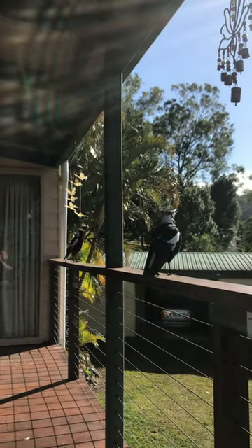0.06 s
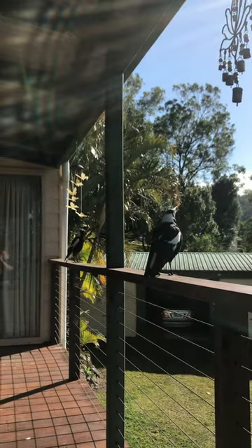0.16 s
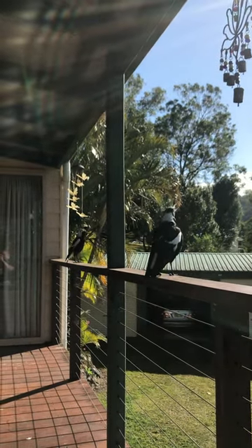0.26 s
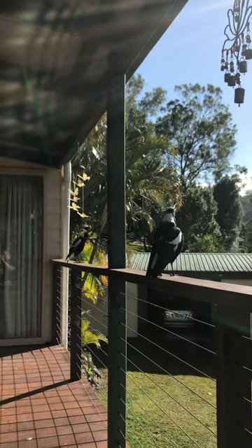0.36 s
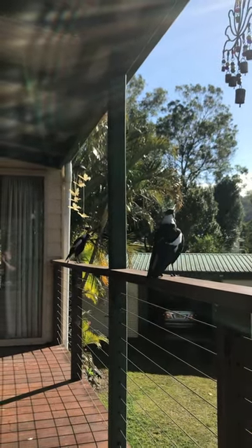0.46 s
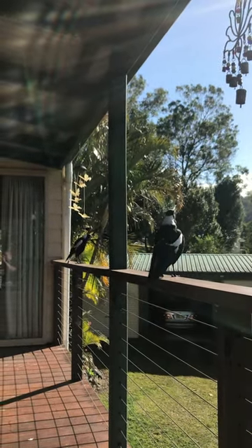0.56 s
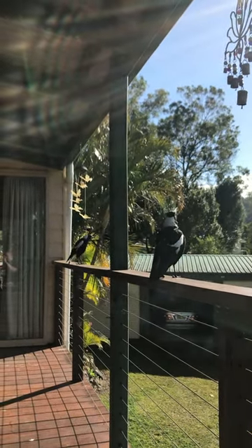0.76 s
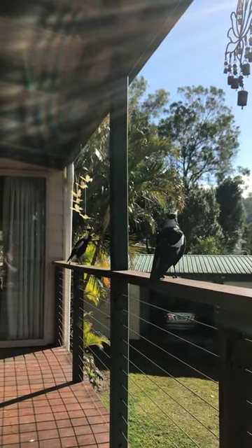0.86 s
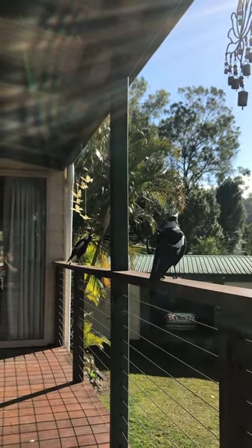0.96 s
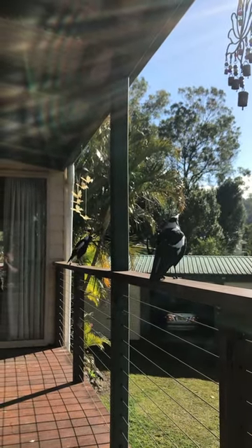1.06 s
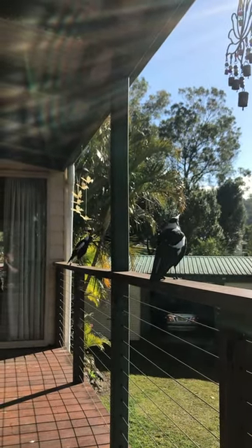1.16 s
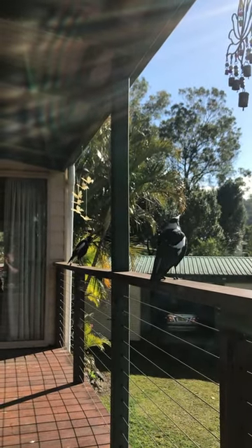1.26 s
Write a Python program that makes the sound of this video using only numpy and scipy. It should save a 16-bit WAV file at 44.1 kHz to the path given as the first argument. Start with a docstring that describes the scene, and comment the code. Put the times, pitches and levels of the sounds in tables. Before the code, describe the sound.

A magpie calls once, loudly, from a veranda rail. Soft outdoor air and faint far bird whistles open the scene; at 0.2 s a fluttering, buzzy whistle starts, drops at about 0.35 s to a longer, strong lower whistle, then weakens and turns to a growling rasp from 0.5 to 0.7 s. Roof and garden echoes fade, leaving distant hum and faint birds until about 1.3 s. Mono.

```python
"""Quiet outdoor air comes first: soft noise, a low distant hum and far birds whistling in the trees.
Then a magpie on a veranda rail gives one loud, falling two-part call.
One side of its syrinx whistles; the other pulses, fluttering the whistle and adding a buzz that ends in a rasp.
The roof and the garden answer with echoes, and one microphone channel holds it all."""
import sys
import numpy as np
from scipy import signal
from scipy.fft import rfft, irfft
from scipy.io import wavfile
from scipy.ndimage import map_coordinates

SR = 44100
rng = np.random.default_rng(int(sys.argv[2]) if len(sys.argv) > 2 else 0)


def generate_wav(sig):
    """Save sig (samples, or channels by samples) to the path in sys.argv[1] as 16-bit PCM at SR."""
    pcm = np.round(np.clip(np.atleast_2d(sig).T, -1, 1) * 32767).astype(np.int16)
    wavfile.write(sys.argv[1], SR, pcm)


N = 57330
T = np.arange(N) / SR  # seconds

# Two resonances of the opening beak. Each row: time in seconds, centre of the first in Hz,
# its level in dB, level of the second in dB (both before the beat).
BEAK_RESONANCES = [(.2, 4500, -70.5, -83.5), (.222, 4384, -39, -69.5), (.25, 4181, -39.5, -50.5),
                   (.29, 3981, -39.5, -41), (.33, 3888, -50.5, -38), (.36, 3830, -56, -58)]


def from_db(db):
    """Gain of a level in dB."""
    return 10 ** (np.asarray(db) / 20)


def rms_one(x):
    """Scale to an rms of 1."""
    return x / np.sqrt(np.mean(x ** 2) + 1e-20)


def in_time(rows):
    """Each column of a curve, at every sample."""
    seconds, *columns = np.transpose(rows)
    return [np.interp(T, seconds, column) for column in columns]


def gate(rows):
    """Open for as long as a curve lasts, with soft edges just outside it."""
    edge_s = 0.0027
    opening = np.clip((T - rows[0][0]) / edge_s + 1, 0, 1)
    closing = np.clip((rows[-1][0] - T) / edge_s + 1, 0, 1)
    return opening * closing


def phase_of(hz):
    """Running phase of a frequency curve, in radians."""
    return 2 * np.pi * np.cumsum(hz) / SR


def high_pass(x, order, hz):
    """Keep what lies above a frequency."""
    return signal.sosfilt(signal.butter(order, hz, "high", fs=SR, output="sos"), x)


def drift(rate_hz):
    """Slow chance with a spread of 1: noise below a rate, taken after the filter has settled."""
    sos = signal.butter(2, rate_hz, fs=SR, output="sos")
    return rms_one(signal.sosfilt(sos, rng.standard_normal(2 * N))[N:])


def coloured(x, spectrum):
    """Causal (minimum-phase) filter that follows a spectrum and keeps the power of white noise."""
    hz, db = np.transpose(spectrum)
    f = np.maximum(np.fft.rfftfreq(2 * N, 1 / SR), 1)
    gain = rms_one(from_db(np.interp(np.log(f), np.log(hz), db)))
    # Folding the cepstrum onto positive time makes the filter causal.
    cepstrum = irfft(np.log(gain))
    cepstrum[1:N] *= 2
    cepstrum[N + 1:] = 0
    return irfft(rfft(x, 2 * N) * np.exp(rfft(cepstrum)))[:N]


def background():
    """Soft outdoor noise, shaped from white noise, and a distant hum, a sine of wandering pitch."""
    # Distant hum. Each row: time in seconds, pitch in Hz, rms level in dB.
    hum_curve = [(0, 185.9, -66.5), (.55, 184.5, -70), (.72, 186.8, -59), (.9, 187.3, -60),
                 (1.08, 189, -63), (1.3, 188.4, -73)]
    # Colour of the outdoor air. Each row: frequency in Hz, relative level in dB per Hz.
    air_colour = [(25, -19), (48, 4), (70, -2.5), (130, -2), (230, -3), (330, -6.5), (500, -17), (800, -13),
                  (1300, -12), (2000, -19), (4000, -23), (7000, -31), (10000, -35), (15000, -37)]
    air_rms_db = -56.5
    hz, db = in_time(hum_curve)
    hum = from_db(db) * np.sqrt(2) * np.sin(phase_of(hz + 2.9 * drift(15)))
    air_noise = from_db(air_rms_db) * coloured(rng.standard_normal(N), air_colour)
    return hum + air_noise


def far_birds():
    """Faint whistles from the trees: gliding sines that waver in pitch and strength."""
    # Each row: start in seconds, length in seconds, pitch in Hz, glide in Hz per second,
    # level in dB (peak, before the waver).
    far_notes = [(-.02, .08, 1630, -1200, -55), (0.046, 0.042, 1440, -300, -56),
                 (0.126, 0.041, 956, -100, -51), (.172, .035, 950, -100, -52),
                 (0.779, 0.17, 4400, 4, -72.5), (.88, .1, 1082, -200, -53), (0.939, 0.13, 1005, -4, -54.5),
                 (1.21, .11, 1310, 4, -61.5)]
    out = np.zeros(N)
    for start, length, hz, glide, db in far_notes:
        swell = np.sqrt(np.abs(np.sin(np.pi * np.clip((T - start) / length, 0, 1))))
        strength = from_db(db) * swell * (1 + 0.49 * drift(73))
        pitch = hz + glide * np.clip(T - start, 0, length) + 14 * drift(60)
        out += strength * np.sin(phase_of(pitch))
    return out


def magpie():
    """Both notes ride on one run of syrinx pulses, which jumps in rate at the break between them."""
    # Pulsing side of the syrinx. Each row: time in seconds, pulses per second,
    # irregularity as a share of the rate.
    pulse_curve = [(.2, 119.4, 0.018), (.3, 125, 0.013), (.32, 128, 0.017), (.345, 142, .02),
                   (.36, 199, 0.0041), (.4, 195, .003), (.43, 192, .002), (.47, 189.3, 0.0028),
                   (.515, 188, 0.011), (.545, 188, 0.023), (.72, 198, 0.026)]
    rate, irregular = in_time(pulse_curve)
    pulses = phase_of(rate * (1 + irregular * drift(110)))
    return upper_note(pulses, irregular) + lower_note(pulses, irregular)


def upper_note(pulses, irregular):
    """The opening whistle, with an undertone, a ringing beak and overtones that grow as it clears."""
    # Whistle. Each row: time in seconds, pitch in Hz, level in dB (before flutter), flutter depth 0-1.
    upper_whistle = [(.195, 1384, -54.5, 0), (.216, 1345, -24, 0.67), (.245, 1339, -24, 0.64),
                     (.27, 1331, -20, 0.4), (.289, 1305, -15.5, 0.1), (.305, 1300, -19, 0.3),
                     (.317, 1299, -19.5, 0.2), (.342, 1289, -19, 0.13), (.358, 1278, -34, 0)]
    # Overtones. Each row: time in seconds, then rms levels in dB of the 2nd, 3rd, 4th, 5th and 9th.
    overtone_levels = [(.2, -75, -63.5, -80, -76, -91), (.225, -56.5, -45.5, -63.5, -74.5, -69),
                       (.29, -55.5, -40.5, -60, -63.5, -52), (.316, -66, -38.5, -40.5, -52.5, -46.5),
                       (.337, -53.5, -31.5, -36, -44.5, -45), (0.36, -50.5, -47, -42, -42.5, -50.5)]
    # Sixth harmonic of the pulses. Each row: time in seconds, level in dB (before its waver).
    undertone_level = [(.2, -55.5), (.218, -46.5), (.242, -58.5), (.27, -41.5), (.3, -43.5), (.32, -50.5),
                       (.35, -49.5)]
    # Buzz. Each row: time in seconds, level in dB (before its shimmer).
    upper_buzz = [(0.2, -65), (0.221, -46), (.255, -41), (.29, -36), (.335, -39), (.358, -49)]
    # Throat and beak colour of the buzz, at a stretch of 1. Each row: frequency in Hz, relative level in dB.
    upper_throat = [(520, -18.5), (820, 2), (1000, 4), (1500, 13.5), (1800, -3.5), (2100, 9.5), (2400, -12),
                    (2750, 1.5), (3100, -9.5), (3850, 0), (4400, -16), (4750, -23), (5300, -6.5),
                    (6300, -5), (7800, -5), (8750, -5.5), (9500, -18), (10500, -20.5), (11300, -10.5),
                    (12200, -13.5), (12800, -22), (14000, -8.5), (14700, -7.5), (15500, -19)]
    beak_open_hz = 3990  # first beak resonance at which the throat colour is unstretched

    tone, phase, beat = whistle(upper_whistle, 10 * pulses)
    shaky = phase + 0.02 * drift(300)
    overtones = sum(from_db(db) * np.sin(k * shaky)
                    for k, db in zip((2, 3, 4, 5, 9), in_time(overtone_levels)))
    overtones = np.sqrt(2) * gate(overtone_levels) * overtones
    undertone = from_db(in_time(undertone_level)[0]) * np.sin(6 * pulses) * (1 + 0.33 * drift(110))
    undertone = np.sqrt(2) * gate(undertone_level) * undertone
    stretch = in_time(BEAK_RESONANCES)[0] / beak_open_hz
    buzzing = buzz(pulses, irregular, upper_buzz, upper_throat, stretch)
    return tone + overtones + undertone + beak_ring(beat) + buzzing


def whistle(note, neighbour):
    """A nearly pure tone that beats with a pulse harmonic near it, below it for most of the call.
    Gives sound, phase and beat."""
    pitch_jitter = 0.0037  # rms share of the pitch
    flutter_swing_rad = 0.062  # phase swing at a flutter depth of 1
    hz, db, depth = in_time(note)
    phase = phase_of(hz * (1 + pitch_jitter * drift(120)))
    beat = phase - neighbour
    flutter = 1 + depth * np.cos(beat)
    tone = flutter * np.sin(phase + flutter_swing_rad * depth * np.sin(beat))
    return gate(note) * from_db(db) * np.sqrt(2) * tone, phase, beat


def beak_ring(beat):
    """The pulses keep two resonances ringing; both sink in pitch as the beak opens."""
    second_ratio, shake_rad = 1.37, .8
    hz, first_db, second_db = in_time(BEAK_RESONANCES)
    rings = sum(from_db(db) * np.sin(phase_of(ratio * hz) + shake_rad * drift(290))
                for ratio, db in ((1, first_db), (second_ratio, second_db)))
    return gate(BEAK_RESONANCES) * np.sqrt(2) * (1 + .5 * np.cos(beat)) * rings


def buzz(pulses, irregular, level, throat, stretch, count=128):
    """Smeared pulses, each with a puff of air, pass a throat whose resonances scale with stretch.
    Uneven pulses leak more air and differ more in strength."""
    smear_rad, pulse_sharpness = 1.4, 0.5
    steady_air, air_per_irregularity = .02, 11  # air as a share of the power
    shimmer_db_per_irregularity = 170

    smear = smear_rad * rng.standard_normal(count)
    step = np.gradient(pulses)  # radians per sample
    # Harmonics beyond half the sample rate are left out.
    harmonics = rms_one(sum(np.cos(k * pulses + smear[k]) * (k * step < np.pi)
                            for k in range(1, count)))
    puffs = rms_one(np.exp(pulse_sharpness * np.cos(pulses) / 2) * rng.standard_normal(N))
    air = np.clip(steady_air + air_per_irregularity * irregular, 0, 1)
    shimmer_db = shimmer_db_per_irregularity * irregular * np.tanh(drift(84))
    gain = gate(level) * from_db(in_time(level)[0] + shimmer_db)
    source = gain * (np.sqrt(1 - air) * harmonics + np.sqrt(air) * puffs)

    # Filtering on a warped clock and then undoing the warp moves the resonances, not the pulses.
    samples, clock = np.arange(N), np.cumsum(stretch)
    warped = map_coordinates(source, [np.interp(samples, clock, samples)], order=3)
    return map_coordinates(coloured(warped, throat), [clock], order=3)


def lower_note(pulses, irregular):
    """The long whistle, then its faint, smooth echo dying away, over a growl and a buzz."""
    # Whistle, and from about .74 s its faint echo. Each row: time in seconds, pitch in Hz,
    # level in dB (before flutter), flutter depth 0-1.
    whistle_and_echo = [(.351, 1185, -28.5, 0), (.364, 1159, -14.5, .1), (.375, 1168, -12.5, 0.1),
                        (.42, 1148, -12.5, 0.11), (.465, 1132, -12.5, 0.07), (.495, 1123, -17.5, 0.21),
                        (.523, 1115, -23.5, 0.12), (.615, 1118, -22, 0.07), (.665, 1110, -31, 0.26),
                        (.702, 1107, -31.5, 0.18), (.745, 1115, -45.5, .1), (.85, 1113, -49, 0),
                        (.92, 1130, -78, .1)]
    # Buzz. Each row: time in seconds, level in dB (before its shimmer).
    lower_buzz = [(0.352, -43.5), (0.379, -36.5), (.42, -39.5), (0.471, -38.5), (.53, -42), (.61, -44.5),
                  (0.683, -49), (0.714, -68), (.75, -75)]
    # Throat and beak colour of the buzz. Each row: frequency in Hz, relative level in dB.
    lower_throat = [(550, -29.5), (800, -6.5), (1400, 7), (1600, -7), (2000, 5.5), (2500, -16.5),
                    (2950, -13.5), (3300, 3), (3600, -6.5), (3790, 7.5), (3920, -8), (4100, -13.5),
                    (4400, -4), (4950, -7.5), (5240, 5.5), (5360, -0.5), (5510, 6), (5750, -4.5),
                    (6350, -3), (6850, -9.5), (7300, -4), (8200, -28.5), (9050, -7.5), (9500, -15),
                    (10400, -21.5), (11500, -0.5), (12400, -19), (13300, -41.5), (14300, -15.5),
                    (15400, -30)]

    fifth = 5 * pulses
    tone, _, _ = whistle(whistle_and_echo, fifth)
    buzzing = buzz(pulses, irregular, lower_buzz, lower_throat, np.ones(N))
    return tone + growl(fifth) + buzzing


def growl(fifth):
    """The fifth pulse harmonic gives way to a narrow band of noise, and the tenth starts to waver."""
    # Each row: time in seconds, level of the fifth harmonic in dB, of the tenth in dB (clean parts).
    growl_levels = [(.35, -45.5, -70), (.385, -32, -58.5), (.43, -49.5, -54.5), (.49, -37, -60),
                    (.525, -50, -47.5), (.555, -38.5, -52.5), (.61, -31, -51.5), (.65, -36, -50.5),
                    (.695, -36.5, -56), (.74, -52, -80)]
    half_width_hz, centre_hz, rough_from_s = 60, 972, .53
    centre = phase_of(np.full(N, centre_hz))
    rasp = drift(half_width_hz) * np.cos(centre) + drift(half_width_hz) * np.sin(centre)
    rasp = rms_one(high_pass(rasp, 4, 800))
    rough = np.clip((T - rough_from_s) / .02, 0, 1)
    fifth_db, tenth_db = in_time(growl_levels)
    clean = (1 - rough * 0.91) * np.sqrt(2) * np.sin(fifth)
    low = from_db(fifth_db) * (rough * rasp + clean)
    high = from_db(tenth_db) * np.sqrt(2) * np.sin(2 * fifth) * (1 + rough * drift(70))
    return gate(growl_levels) * (low + high)


def surroundings(x):
    """Single reflections, treble scattered under the roof and a long dull tail from the trees."""
    # Reflections from rail, roof, wall and the next house. Each row: delay in seconds, level in dB.
    echoes = [(.0062, -43.5), (0.0151, -17.5), (0.0227, -22.5), (0.117, -29), (.225, -33.5)]
    veranda_t60_s, veranda_db, veranda_low_hz = 0.085, -1, 2730
    garden_t60_s, garden_db, garden_dull_hz = 1.19, -22, 1790
    near = sum(from_db(db) * np.interp(T - delay, T, x, left=0) for delay, db in echoes)
    bright = high_pass(x, 3, veranda_low_hz)
    dull = signal.sosfilt(signal.butter(1, garden_dull_hz, fs=SR, output="sos"), x)
    veranda = from_db(veranda_db) * tail(bright, veranda_t60_s)
    garden = from_db(garden_db) * tail(dull, garden_t60_s)
    return near + veranda + garden


def tail(x, t60):
    """Diffuse, dying reflections: noise that builds up over 14 ms and loses 60 dB in t60 seconds."""
    response = rng.standard_normal(N) * from_db(-60 * T / t60) * np.clip(T / 0.014, 0, 1)
    return signal.fftconvolve(x, response / np.linalg.norm(response))[:N]


def scene():
    """The call in its surroundings, over the quiet garden, as one channel."""
    call = magpie()
    return (background() + far_birds() + call + surroundings(call))[None]


def record(dry):
    """The top is cut steeply above 15.4 kHz."""
    return signal.sosfilt(signal.ellip(10, .1, 70, 15400, fs=SR, output="sos"), dry)


dry = scene()
out = record(dry)
generate_wav(out)
```